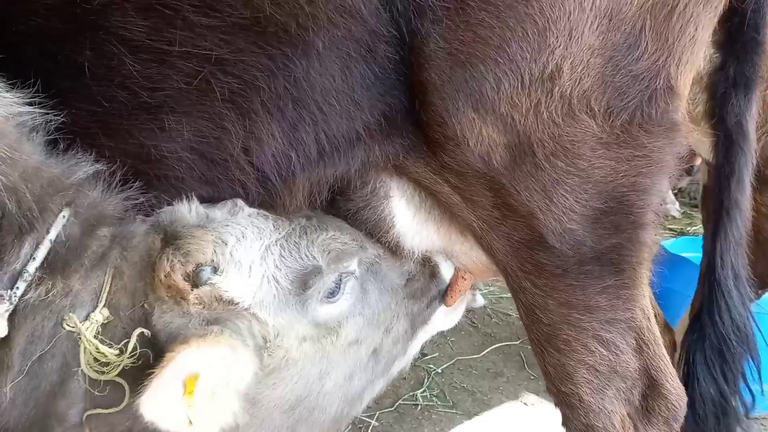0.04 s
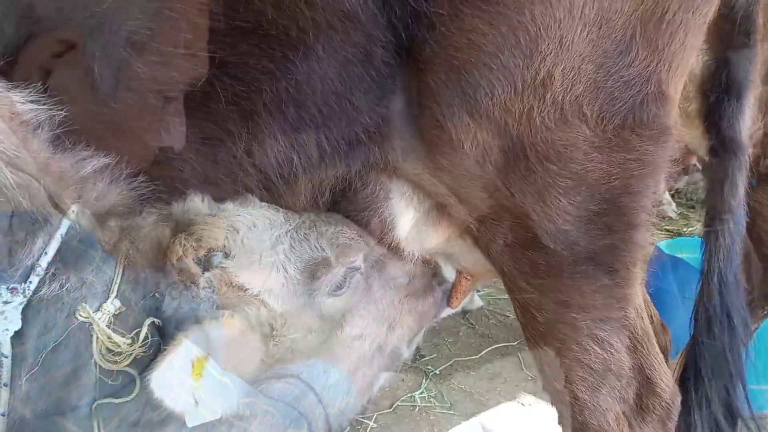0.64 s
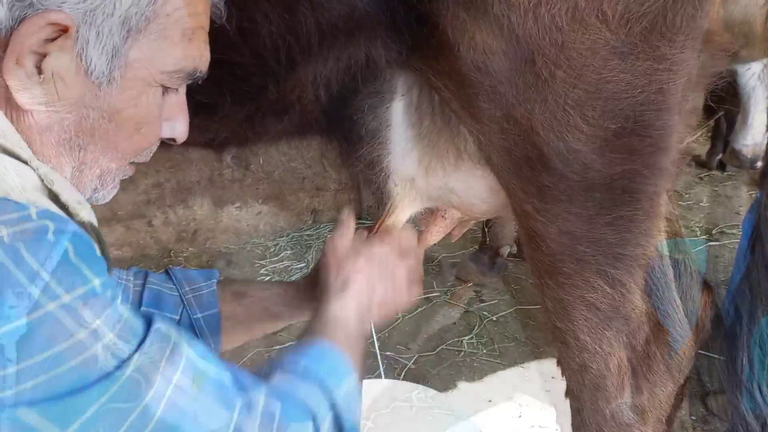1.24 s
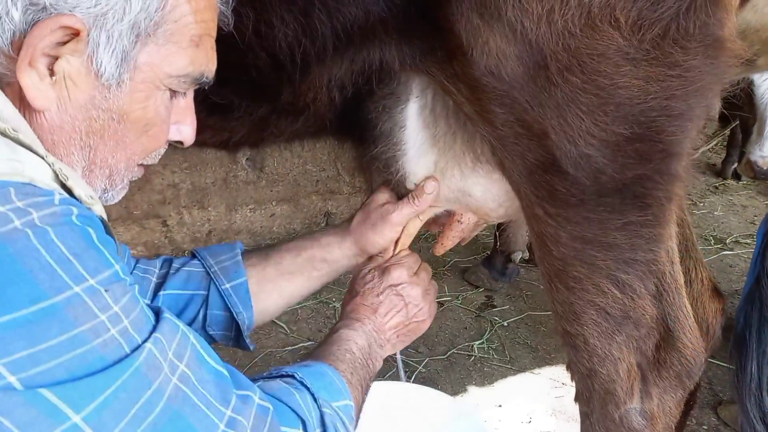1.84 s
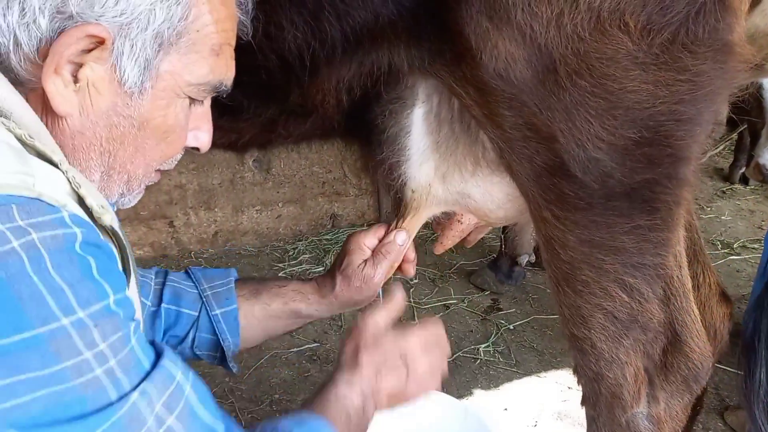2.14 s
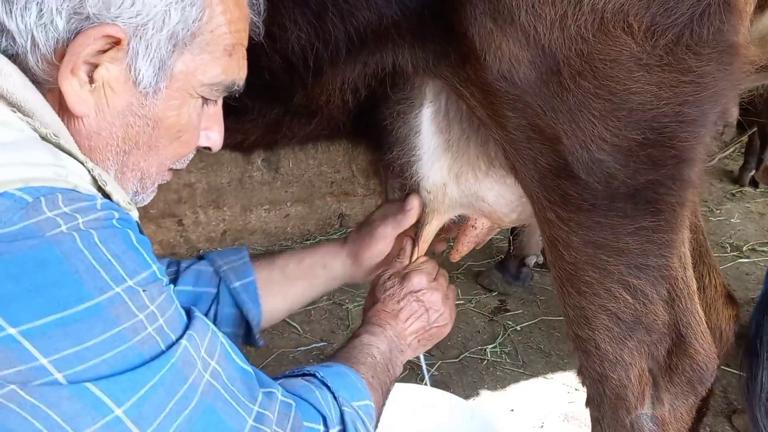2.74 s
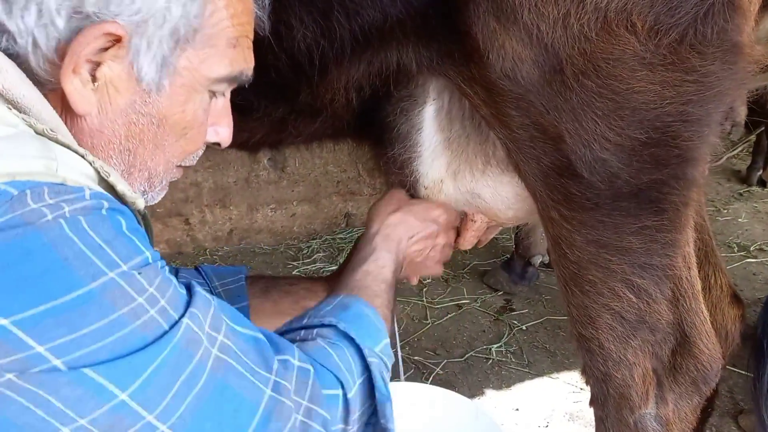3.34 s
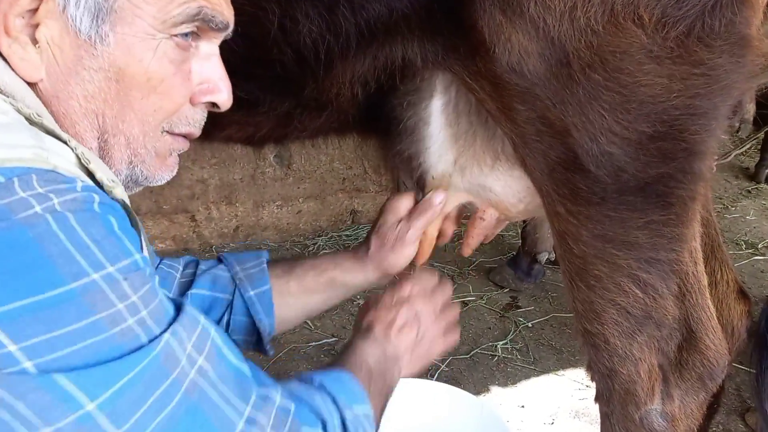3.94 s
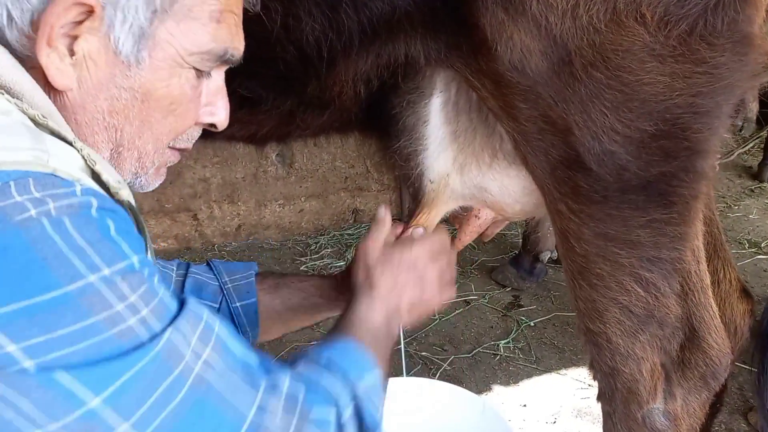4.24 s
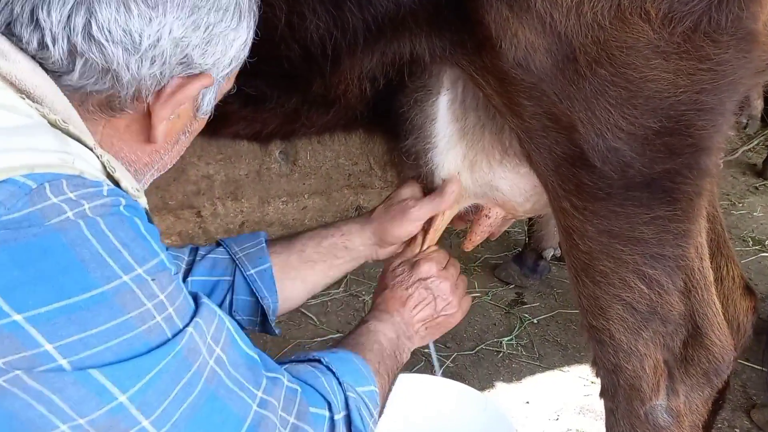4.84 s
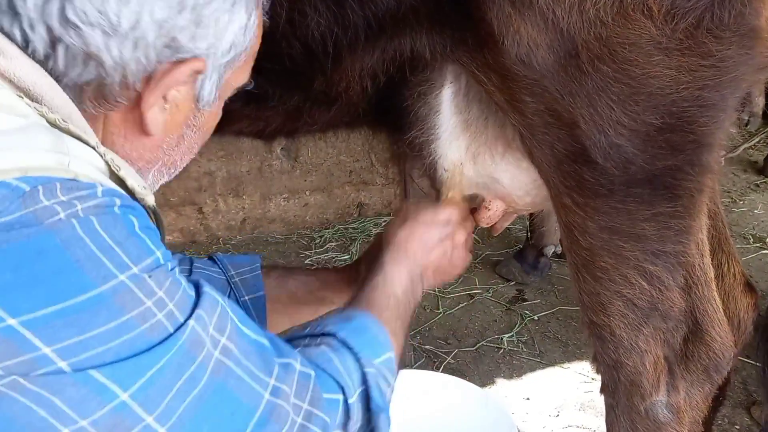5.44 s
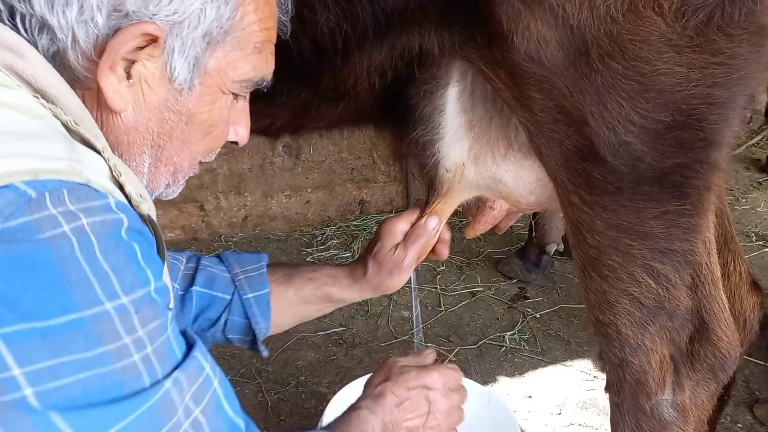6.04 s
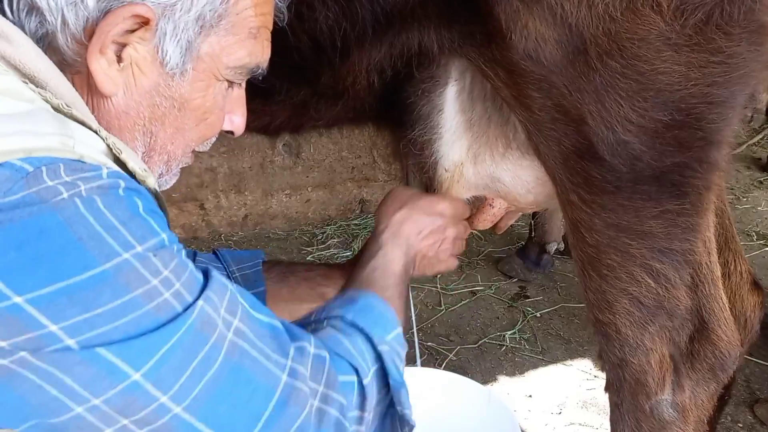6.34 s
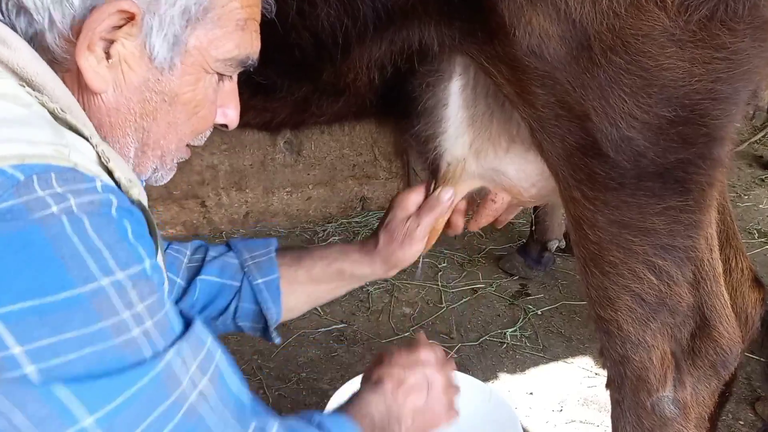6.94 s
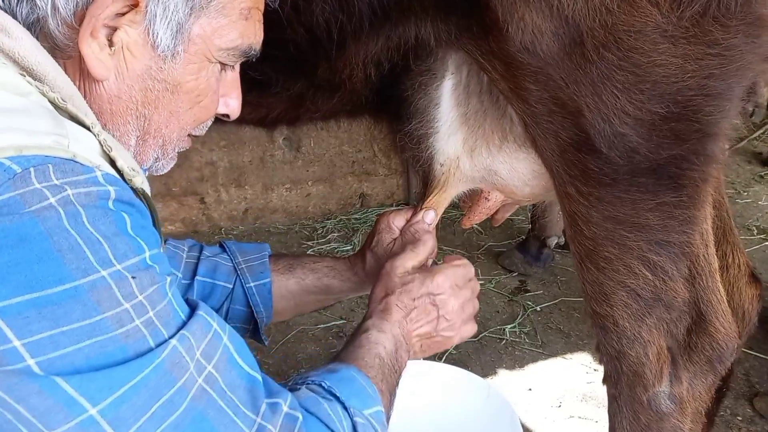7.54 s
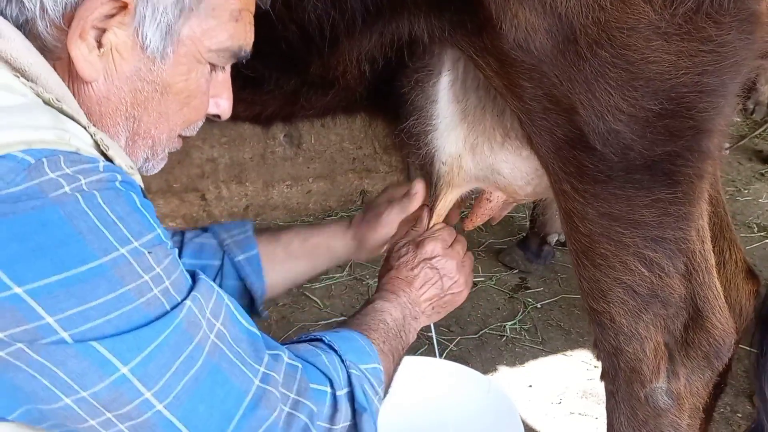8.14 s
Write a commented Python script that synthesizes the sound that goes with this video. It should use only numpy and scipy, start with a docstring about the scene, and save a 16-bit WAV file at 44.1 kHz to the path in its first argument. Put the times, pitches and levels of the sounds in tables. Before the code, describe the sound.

Milk squirts rhythmically into a plastic bucket as a cow is milked by hand, after a faint cowbell clink.

```python
"""A cow is milked by hand into a plastic bucket in a farmyard, the two hands squirting in turn.
Each jet starts as fine spray, then drives bubbles into the froth, and these ring the air in the bucket.
Around it animals shuffle, a calf nuzzles the udder, a cowbell is nudged faintly
and a small bird calls twice, all over a bed of still air with a low distant drone."""
import sys
import numpy as np
from scipy import signal
from scipy.fft import rfft, irfft, next_fast_len
from scipy.io import wavfile

SR = 44100
rng = np.random.default_rng(int(sys.argv[2]) if len(sys.argv) > 2 else 0)


def int16_out(signal):
    """Quantize to a 16-bit WAV file."""
    q = np.round(np.clip(np.atleast_2d(signal).T, -1, 1) * 32767)
    wavfile.write(sys.argv[1], SR, q.astype(np.int16))


N = 361619
TIME = np.arange(N) / SR

# Tone of the air, shuffling, rubbing and hair. Each row: frequency in Hz, relative density in dB.
AIR_COLOUR = [(30, -38), (52, -16.5), (76, 2.5), (98, -4), (118, -4), (150, -9.5), (300, -6.5), (500, -7),
              (900, -19.5), (2000, -19.5), (3600, -17.5), (5500, -23.5), (8000, -35), (11500, -16),
              (15500, -46)]
SHUFFLE_COLOUR = [(45, -28), (80, -6), (120, -3), (180, -7), (245, 2), (330, -2), (450, -1), (650, -8),
                  (1300, -48), (4000, -72)]
RUB_COLOUR = [(200, -29), (500, -4.5), (1000, -3), (1650, -2), (2400, -6.5), (4000, -19), (9000, -59)]
HAIR_COLOUR = [(1200, -7), (3000, -2), (5300, -5), (8000, -7.5), (11500, -6), (15500, -13)]
# Width of diffuse sound. Each row: frequency in Hz, left-right likeness from 0 to 1.
LIKENESS = [(100, 0.86), (500, 0.8), (1500, 0), (4000, 0)]
# Hooves, hide and sleeves shifting. Each row: peak time in seconds, relative level in dB,
# rise and fall in seconds per 20 dB.
SHUFFLES = [(0.0, -55, .05, 0.11), (.17, -48.5, 0.29, 0.54), (3.184, -43.5, 0.043, 0.12),
            (7.0, -53, 0.2, 0.2), (7.56, -49, 0.37, .25), (7.795, -39, .12, 0.19), (8.15, -57.5, 0.061, .2)]
# The calf nuzzles the udder. Each row: peak time in seconds, relative levels of soft rubbing and
# dry hair in dB, rise and fall in seconds per 20 dB.
NUZZLES = [(0.0, -61, -59, .05, 0.18), (.105, -53.5, -51, 0.009, .3), (.205, -46.5, -56, 0.13, .13),
           (.43, -58.5, -66, 0.15, .4), (.612, -62, -61, .08, .25), (1.066, -63, -62.5, 0.033, 0.085)]
# Clapper touches. Each row: start in seconds, level in dB, lift of the upper modes in dB.
BELL_STROKES = [(-.04, -58, 10), (.14, -38.5, -28), (.2, -41.5, -12), (.265, -63, 12.5), (.545, -52, -21),
                (.612, -48, -5), (1.05, -62, -24), (2.95, -56, 7), (3.972, -43, -5.5), (4.16, -51.5, 2)]
# Cowbell modes. Each row: pitch in Hz, relative level in dB, seconds to fade by 60 dB.
BELL_MODES = [(870, 5, 0.3), (941, -1, 0.17), (2307, -5.5, .6), (2410, -3, 0.88), (4150, -11.5, 0.38),
              (4340, -9.5, 0.3), (6700, -3, 0.1), (6650, -20, .3)]
# One squirt per pull on a teat. Each row: times of first spray, plunge, centre of the swell and start of the
# ebb in seconds; then in dB the relative froth level, swell, sag until the ebb, fizz and churn over froth,
# churn lacking at first and relative spray level; last, ebb in dB per second. In the last row the ebb time
# comes before the start, so that squirt's level falls steadily after the plunge.
SQUIRTS = [ (0.71, 0.738, .95, 0.96, -68.5, 7, 0, 5, -5, 9, -61, 160),
           (1.139, 1.166, 1.385, 1.468, -45, 16.5, 11, -2, -10, 12, -51.5, 128),
           (1.684, 1.735, 1.885, 1.93, -42, 10, 2, 1, -7.5, 4, -46.5, 216),
           (2.193, 2.221, 2.389, 2.533, -34.5, 9, 4, .5, -14, 3, -41.5, 217),
           (2.713, 2.738, 2.9, 2.924, -41, 0, 3.5, 3.5, -5, 8.5, -38.5, 133),
           (3.126, 3.164, 3.375, 3.53, -39.5, 22, 8.5, 2.5, -14.5, 15, -44, 186),
           (3.697, 3.74, 3.88, 3.96, -57.5, 7, -6, 1, -6, -5, -45.5, 143),
           (4.182, 4.212, 4.4, 4.535, -36, 9, 11, -0.5, -14.5, 10, -39, 193),
           (4.722, 4.773, 4.834, 4.96, -47.5, 16, 5.5, 2.5, -7, -1.5, -41, 153),
           (5.187, 5.218, 5.403, 5.512, -38, 17.5, 13, -0.5, -12, 3, -42.5, 163),
           (5.692, 5.724, 5.94, 5.96, -50, 1, 0, 2.5, -1.5, 3.5, -44.5, 132),
           (6.176, 6.204, 6.382, 6.501, -33, 14, 9, 2, -15.5, 5.5, -40, 195),
           (6.697, 6.747, 6.86, 6.857, -44.5, 11.5, -0.5, 3, -6, 2.5, -44, 196),
           (7.13, 7.177, 7.46, 7.85, -33.5, 5.5, -1, 1.5, -7.5, 30, -42, 191),
           (8.134, 8.183, 8.3, 8.12, -28, 7.5, -0.5, 6, -5.5, -0.5, -46, 175)]
# Brief gushes of the jet. Each row: time and length in seconds, lifts of froth, fizz and spray in dB.
GUSHES = [(1.307, 0.15, 2.5, 5.5, -3.5), (1.401, .01, -2, 7.5, 10), (1.778, 0.044, 5, 7.5, -4),
          (2.329, .045, -1, 5, 6.5), (2.375, 0.067, 3.5, -3.5, 6), (2.471, 0.03, -3, 4, 3.5),
          (2.748, 0.021, 5.5, 7.5, 0), (2.934, 0.033, 9, -14, 5.5), (3.224, 0.033, 0.5, 7, 8.5),
          (3.318, 0.058, 4.5, 3, 1), (3.497, .042, 3.5, 6.5, 0.5), (3.832, .03, 4, 4, 8),
          (3.946, 0.036, -2.5, 10, 2), (4.269, 0.025, 3, 9.5, 6), (4.331, 0.047, 6, 7.5, -1),
          (4.368, 0.043, 8.5, 0.5, 4), (4.517, 0.058, 5.5, 14, -4), (4.782, 0.045, 5, 9, -7),
          (4.991, 0.11, 5, 13.5, 7.5), (5.23, .063, 6.5, 9.5, 3), (5.315, 0.01, 3, 1, 0),
          (5.383, 0.049, 8.5, 11.5, 6.5), (5.736, 0.031, -2, 4, 10.5), (5.92, .062, 2, 2, 7),
          (6.354, 0.069, 5.5, 7, 2), (6.791, 0.013, 2, 8, -3), (7.223, .15, 0.5, 4, 6.5),
          (8.181, 0.0076, 2, 15.5, 3)]
# Tone of the spray. Each row: frequency in Hz, left and right gain in dB.
SPRAY_COLOUR = [(2720, -14, -11), (3660, -9, -1.5), (4350, -10, -7), (5440, -17.5, -19.5),
                (6350, -14, -26.5), (8630, -15.5, -27.5), (8840, -14.5, -14), (10620, -8.5, -0.5),
                (11700, -4, 2), (12420, -15, -2.5), (14600, -10, -20), (15460, -18, -24.5)]
# Air modes of the bucket. Each row: pitch and bandwidth in Hz, level within its register in dB,
# left over right in dB, left lead in radians.
BUCKET_MODES = [(252, 7.4, -19.5, 4, -0.26), (378.7, 24, -15, 2, -0.8), (504.4, 22, -9, 0.5, -0.12),
                (593, 42, -12, 0.5, 0), (705, 89, -7.5, -1, 0.5), (864, 65, -13, -4, 1.5),
                (915, 75, -5.5, -1, 0.16), (1087, 17, -21.5, 2.5, 0.5), (1246, 39, -14.5, -6, 1.3),
                (1291, 13, -14.5, 8, -4), (1378, 120, -6, -2, -0.8), (1511, 25, -14.5, 3.5, 1.3),
                (1640, 64, -20, 2.5, 1), (1865, 120, -12.5, 1, 0.6), (1930, 21, -11, 11, 4),
                (2015, 230, -8.5, 4.5, 1), (2260, 130, -19.5, -15, 3), (2230, 550, -6, 0, -2),
                (2695, 83, -10, -6, -1.0), (2520, 96, -22, -1.5, -3), (2876, 240, -16, -21, -2.5),
                (3179, 150, -11, -17, 2.5), (3120, 300, -11.5, -4.5, -0.6), (3266, 91, -15.5, -12.5, 0),
                (3507, 79, -10.5, -18, 2.1), (3680, 520, -17, 5, -1.2), (3845, 120, -9.5, -17.5, -0.07),
                (4175, 140, -10.5, -9.5, 4), (4530, 330, -15, -1.5, -3.5)]
# Single hard drops. Each row: time in seconds, relative level in dB.
DROPS = [(2.1906, -23), (2.2373, -20), (2.466, -8), (2.7152, -33), (2.9457, -33), (3.034, -25), (3.13, -25),
         (3.2326, -17.5), (3.3583, -12), (3.4504, -12), (3.567, -14.5), (4.194, -14), (4.721, -45),
         (4.9816, -16), (5.1875, -24.5), (5.392, -3.5), (5.4174, -17), (5.574, -23.5), (5.7478, -31),
         (5.832, -18), (5.891, -19), (6.1828, -27), (6.5493, -9.5), (6.6157, -25), (6.6985, -41),
         (7.129, -26), (7.2603, -6), (7.4101, -6), (8.1328, -29), (8.1825, -11)]
# Bird notes. Each row: start and length in seconds, first and last pitch in Hz, relative level in dB.
CHIRPS = [(4.914, 0.098, 6900, 6200, -51), (5.05, .1, 6600, 5700, -48.5)]
# In the long squirt the hollow under the jet deepens and its ring falls.
# Each row: time in seconds, pitch in Hz, lift in dB.
HOLLOW = [(7.2, 3500, -3), (7.28, 3130, 5), (7.34, 2720, 10), (7.45, 1860, 4), (7.6, 1470, 7.5),
          (7.8, 1290, 6), (7.95, 1300, -9)]

CHURN_TOP_HZ, FROTH_TOP_HZ = 1000, 2550  # deep churn gives way to froth, and froth to fizz


def from_db(db):
    """Decibels to gain."""
    return 10 ** (np.asarray(db) / 20)


def rms_one(x):
    """Scale so that the centre of the stereo image has rms 1."""
    return x / np.sqrt(np.mean(np.atleast_2d(x).mean(0) ** 2) + 1e-20)


def at_hz(points, hz):
    """Read a (Hz, value) table on a log axis."""
    table_hz, values = np.transpose(points)
    return np.interp(np.log(hz), np.log(table_hz), values)


def shaped(x, response):
    """Equalise by a gain given as a function of frequency."""
    size = next_fast_len(N + 4096, True)
    hz = np.maximum(np.arange(size // 2 + 1) * SR / size, 1)
    return irfft(rfft(x, size) * response(hz), size)[..., :N]


def cut(x, hz, kind, order=2):
    """Butterworth low- or high-pass."""
    return signal.sosfilt(signal.butter(order, hz, kind, fs=SR, output="sos"), x)


def panned(db):
    """Left and right gains for a level difference."""
    return from_db(np.array([[db], [-db]]) / 2)


def drift(per_s):
    """A random wander of rms 1 that turns per_s times a second."""
    knots = rng.standard_normal(8192)
    return rms_one(np.interp(TIME * per_s, np.arange(len(knots)), knots))


def grains(per_s, spread_db):
    """Random impacts of uneven size; rms 1."""
    sizes = from_db(spread_db * np.minimum(rng.exponential(1, N), 4)) * rng.choice([-1, 1], N)
    return rms_one(sizes * (rng.random(N) < per_s / SR))


def echoes(x, t60, dull_hz):
    """A dying cloud of reflections, different at each ear, of unit energy."""
    t = TIME[:SR // 2]
    cloud = cut(rng.standard_normal((2, len(t))), dull_hz, "low", order=1) * from_db(-60 * t / t60)
    cloud /= np.sqrt(np.sum(cloud ** 2, axis=1, keepdims=True))
    return signal.fftconvolve(np.atleast_2d(x), cloud, axes=1)[:, :N]


def diffuse(mid, side, colour):
    """Two unrelated signals as coloured stereo, narrow in the bass and wide on top; rms 1."""
    mid = shaped(mid, lambda hz: from_db(at_hz(colour, hz)) * np.sqrt(1 + at_hz(LIKENESS, hz)))
    side = shaped(side, lambda hz: from_db(at_hz(colour, hz)) * np.sqrt(1 - at_hz(LIKENESS, hz)))
    return rms_one(mid + side * [[1], [-1]])


def swells(rows, column):
    """One envelope for movements that each rise to their level and die away."""
    power = np.zeros(N)
    for row in rows:
        peak, db, rise_s, fall_s = row[0], row[column], row[-2], row[-1]
        down_db = 20 * np.maximum((peak - TIME) / rise_s, (TIME - peak) / fall_s)
        near = down_db < 80
        power[near] += from_db(db - down_db[near]) ** 2
    return np.sqrt(power)


def yard_air(level_db=-67):
    """A bed of still air with a low distant drone."""
    return from_db(level_db) * diffuse(*rng.standard_normal((2, N)), AIR_COLOUR)


def shuffling():
    """Hooves, hide and sleeves shift in dull, grainy swells."""
    texture = diffuse(grains(1500, 0.59), grains(1500, 2.5), SHUFFLE_COLOUR)
    return from_db(-1.5) * swells(SHUFFLES, column=1) * texture


def nuzzling():
    """The calf rubs softly against the udder, and dry hair rustles on top."""
    rub = swells(NUZZLES, column=1) * diffuse(grains(5000, 3.5), grains(5000, 2.0), RUB_COLOUR)
    hair = swells(NUZZLES, column=2) * diffuse(grains(7700, 3.0), grains(7000, 3.0), HAIR_COLOUR)
    return from_db(0.5) * rub + from_db(0.9) * hair


def cowbell(attack_s=0.0046, upper_hz=1500):
    """A sheet-metal bell, barely touched by its clapper as an animal moves its head."""
    out = np.zeros(N)
    for start, db, upper_db in BELL_STROKES:
        span = slice(max(int(start * SR), 0), int((start + 1) * SR))
        age = np.maximum(TIME[span] - start, 0)
        attack = 1 - np.exp(-age / attack_s)
        for hz, mode_db, t60 in BELL_MODES:
            level_db = db + mode_db + upper_db * (hz > upper_hz) - 60 * age / t60
            out[span] += from_db(level_db) * attack * np.sin(2 * np.pi * (hz * age + rng.random()))
    return out + from_db(-8) * echoes(out, t60=0.15, dull_hz=6000)


def squirting(swell_s=0.11, attack_db_per_s=1500, dulling_db_per_s=4.5):
    """Envelopes of churn, froth, fizz and spray: most squirts start thin and deepen as the jet digs in."""
    spray_weak_db, spray_build_s, spray_share = 6, 0.093, 0.53
    spray_attack_db_per_s, linger_s, spray_ebb_db_per_s = 8003, 0.04, 257
    power = np.zeros((4, N))
    for (start, plunge, swell_at, ebb_at, froth_db, swell_db, sag_db,
         fizz_db, churn_db, thin_db, spray_db, ebb_db_per_s) in SQUIRTS:
        span = slice(int((start - 0.05) * SR), int((ebb_at + 0.5) * SR))
        t = TIME[span]
        age = np.clip(t, plunge, ebb_at) - plunge
        effort = swell_db * np.exp(-0.5 * ((t - swell_at) / swell_s) ** 2)
        effort -= sag_db * age / (ebb_at - plunge)
        jet = froth_db + effort - attack_db_per_s * np.maximum(plunge - t, 0)
        jet -= ebb_db_per_s * np.maximum(t - ebb_at, 0)
        shallow = np.clip((swell_at - t) / (swell_at - plunge), 0, 1)
        churn = jet + churn_db - thin_db * shallow
        fizz = jet + fizz_db - dulling_db_per_s * age
        # spray comes first, a little weak, shares the jet's swell and sag, and lingers briefly
        mist = spray_db + spray_share * effort
        mist -= spray_weak_db * np.clip(1 - (t - start) / spray_build_s, 0, 1)
        mist -= spray_attack_db_per_s * np.maximum(start - t, 0)
        mist -= spray_ebb_db_per_s * np.maximum(t - ebb_at - linger_s, 0)
        power[:, span] += from_db([churn, jet, fizz, mist]) ** 2
    return np.sqrt(power)


def splash(impacts, scatter_s, mist_db=7.5):
    """Each impact ticks, then shatters into a mist that hisses briefly and differently at each ear."""
    decay = np.exp(-1 / (scatter_s * SR))
    mist_power = signal.lfilter([1 - decay], [1, -decay], impacts ** 2 + 1e-18)
    mist = np.sqrt(mist_power) * rng.standard_normal((2, N))
    spray_hz, *ears_db = np.transpose(SPRAY_COLOUR)
    colour = lambda hz: from_db([np.interp(np.log(hz), np.log(spray_hz), db) for db in ears_db])
    return cut(shaped(impacts + from_db(mist_db) * mist, colour), 1300, "high")


def spray(sputter, envelope):
    """The jet breaks into droplets that patter on froth and plastic."""
    droplets = grains(per_s=2400, spread_db=3.5) * sputter
    return rms_one(splash(droplets, scatter_s=0.0015)) * envelope


def froth(sputter, churn, flow, fizz, rim_hz=4650, wander_db=3.0):
    """Bubbles burst in the milk; each strikes every air mode of the bucket with a strength of its own."""
    registers = [from_db(2.2) * churn, from_db(0.6) * flow, from_db(-1.2) * fizz]
    bursts = grains(per_s=2200, spread_db=0) * sputter
    out = np.zeros((2, N))
    for hz, width_hz, db, pan_db, lead in BUCKET_MODES:
        # the point of impact wanders, favouring now one mode, now another
        coupling = rms_one(from_db(wander_db * drift(per_s=40))) * rng.standard_normal(N)
        envelope = registers[np.searchsorted([CHURN_TOP_HZ, FROTH_TOP_HZ], hz)]
        push = coupling * (bursts * hollow(hz) * envelope + 1e-18)
        radius = np.exp(-np.pi * width_hz / SR)
        feedback = [1, -2 * radius * np.cos(2 * np.pi * hz / SR), radius ** 2]
        left = np.sqrt((1 - radius ** 2) / 2) * signal.lfilter([1, 0, -1], feedback, push)
        # each mode leaves the rim in its own direction
        right = np.interp(TIME - lead / (2 * np.pi * hz), TIME, left)
        out += from_db(db) * panned(pan_db) * np.array([left, right])
    return cut(cut(out, rim_hz, "low", order=4), 220, "high")


def bubbles(flow, fizz, count=520, low_hz=1200, high_hz=4200, cycles=55, glide=0.044):
    """Larger bubbles trapped by the jet ring on their own, rising in pitch as they surface."""
    out = np.zeros((2, N))
    for when, pitch, size, side in rng.random((count, 4)):
        hz = low_hz * (high_hz / low_hz) ** pitch
        onset, t60 = int(when * (N - SR // 10)), cycles / hz
        age = TIME[:int(t60 * SR)]
        strength = (flow if hz < FROTH_TOP_HZ else fizz)[onset] * from_db(9 * size + 2.25)
        ring = np.sin(2 * np.pi * hz * age * (1 + glide * age / t60 / 2)) * from_db(-60 * age / t60)
        out[:, onset:onset + len(age)] += strength * panned(8 * (side - 0.5) - 7 * pitch) * ring
    return cut(out, 660, "high")


def gushing(rise_s=0.0055, churn_share=0.88):
    """Each gush jolts the flow and ebbs away: gains of churn, froth, fizz and spray."""
    lift_db = np.zeros((3, N))
    for peak, length_s, *peaks_db in GUSHES:
        span = slice(int((peak - rise_s) * SR), int((peak + 3 * length_s) * SR))
        age = TIME[span] - peak
        envelope = np.clip(1 + age / rise_s, 0, 1) * np.exp(-(age / length_s) ** 2)
        lift_db[:, span] += np.outer(peaks_db, envelope)
    flow, fizz, mist = from_db(lift_db)
    return np.array([flow ** churn_share, flow, fizz, mist])


def drops():
    """Larger drops smack here and there during and around the squirts."""
    clicks = np.zeros(N)
    for start, db in DROPS:
        clicks[round(start * SR)] = from_db(db)
    return splash(clicks, scatter_s=0.0013)


def bird():
    """Thin falling whistles, blurred by the yard."""
    out = np.zeros(N)
    wobble = 1 + 0.022 * drift(per_s=210)
    for start, length_s, first_hz, last_hz, db in CHIRPS:
        progress = np.clip((TIME - start) / length_s, 0, 1)
        hz = (first_hz + (last_hz - first_hz) * progress) * wobble
        envelope = np.sqrt(np.abs(np.sin(np.pi * progress)))
        out += from_db(db) * envelope * np.sin(2 * np.pi * np.cumsum(hz) / SR)
    return 0.58 * out + 0.35 * echoes(out, t60=0.1, dull_hz=9000)


def hollow(hz, width_octaves=0.39):
    """Gain with which the hollow under the jet colours a mode near its own pitch."""
    times, ring_hz, lift_db = np.transpose(HOLLOW)
    span = slice(int(times[0] * SR), int(times[-1] * SR))
    apart = np.log2(hz / np.interp(TIME[span], times, ring_hz)) / width_octaves
    gain = np.ones(N)
    gain[span] = from_db(np.interp(TIME[span], times, lift_db) * np.exp(-apart ** 2))
    return gain


def scene(sputter_db=1.2):
    """Milk up front, its spray and froth sputtering together with the jet; the farmyard behind."""
    sputter = rms_one(from_db(sputter_db * drift(per_s=140)))
    churn, flow, fizz, mist = squirting() * gushing()
    milk = from_db(-1.27) * froth(sputter, churn, flow, fizz)
    milk += from_db(-2.5) * bubbles(flow, fizz)
    milk += from_db(-1.0) * spray(sputter, mist)
    milk += from_db(3.5) * drops()
    milk += from_db(-14.5) * echoes(milk, t60=0.16, dull_hz=3500)
    return milk + cowbell() + bird() + yard_air() + shuffling() + nuzzling()


def record(dry, cutoff_hz=15750):
    """A steep low-pass takes off the very top."""
    return signal.sosfilt(signal.ellip(10, 0.1, 80, cutoff_hz, fs=SR, output="sos"), dry)


dry = scene()
out = record(dry)
int16_out(out)
```